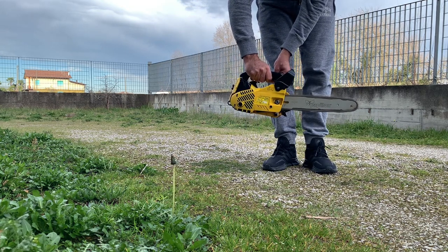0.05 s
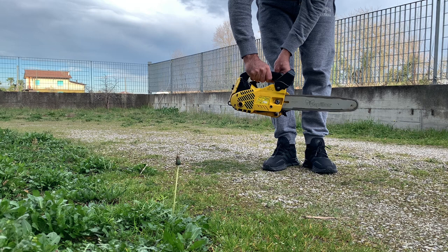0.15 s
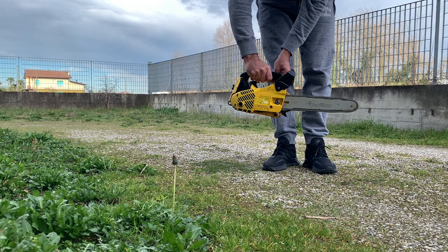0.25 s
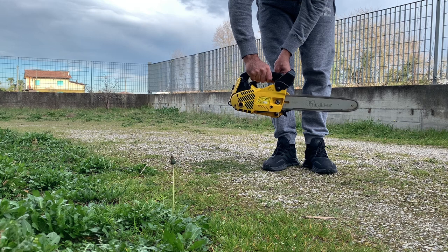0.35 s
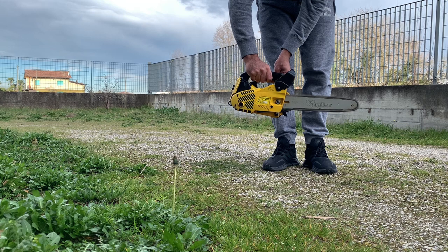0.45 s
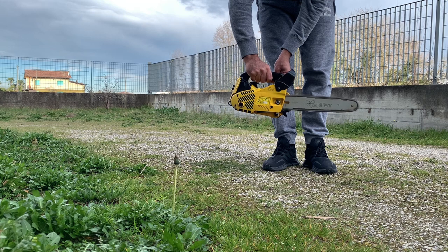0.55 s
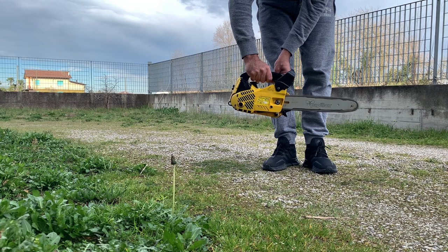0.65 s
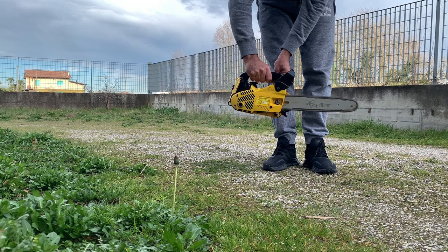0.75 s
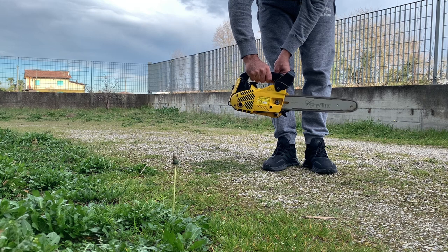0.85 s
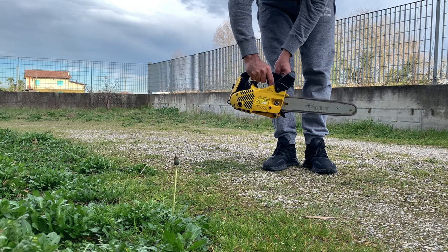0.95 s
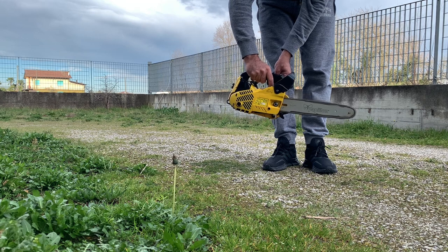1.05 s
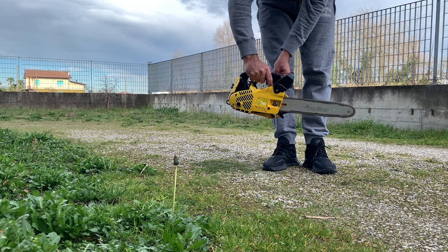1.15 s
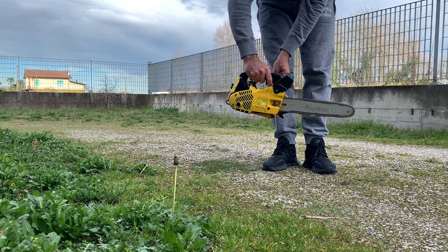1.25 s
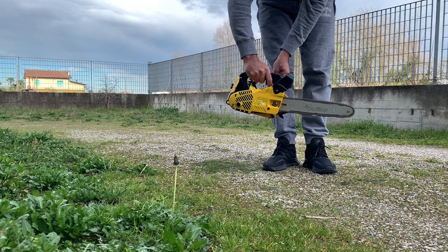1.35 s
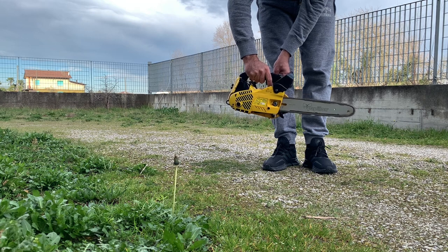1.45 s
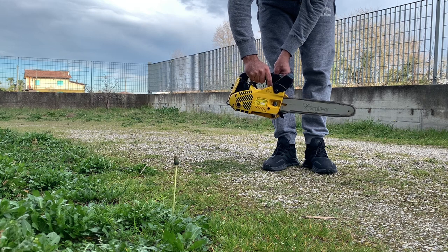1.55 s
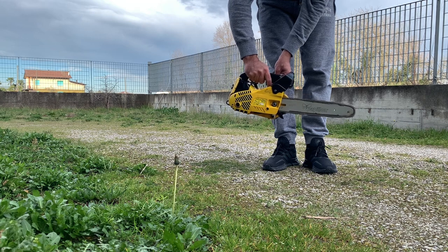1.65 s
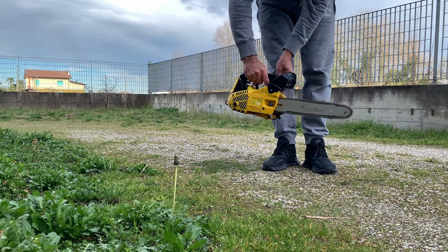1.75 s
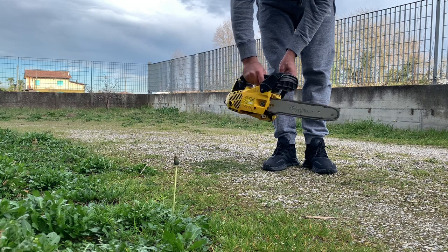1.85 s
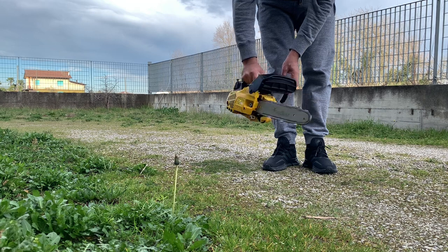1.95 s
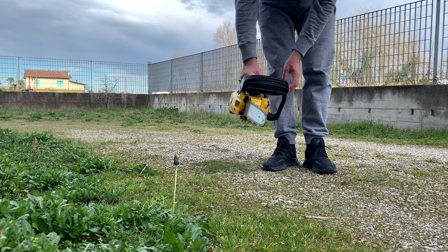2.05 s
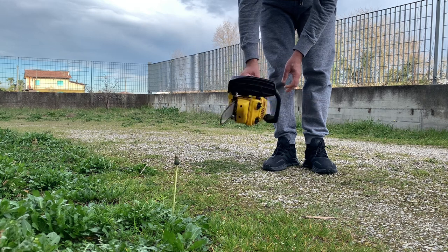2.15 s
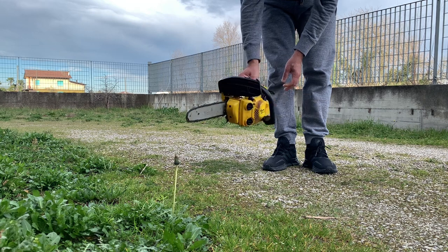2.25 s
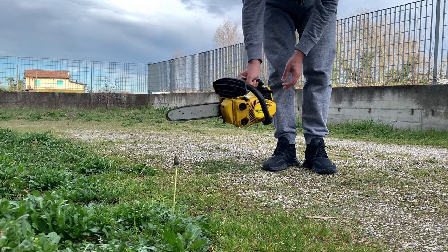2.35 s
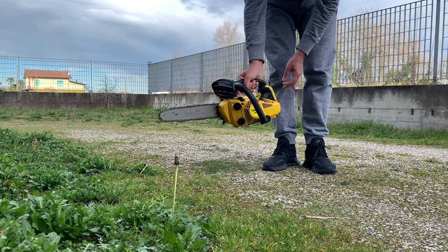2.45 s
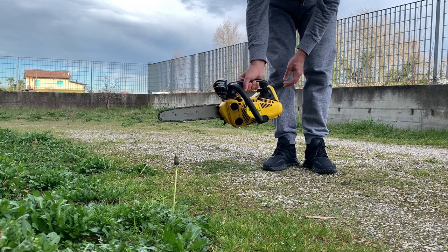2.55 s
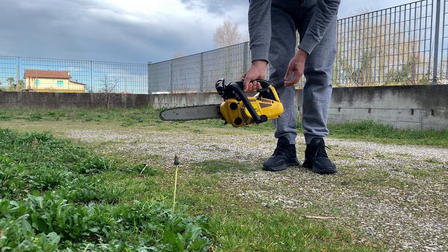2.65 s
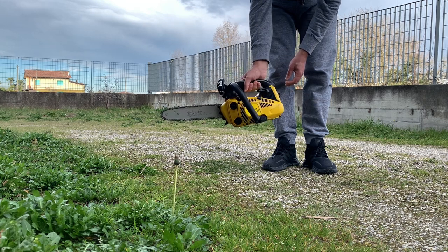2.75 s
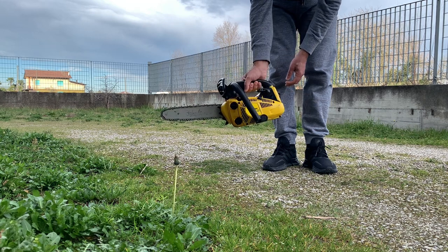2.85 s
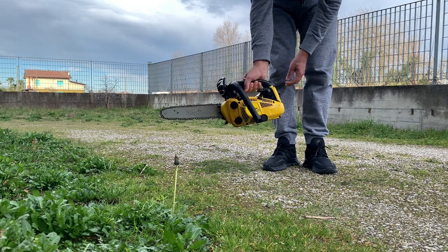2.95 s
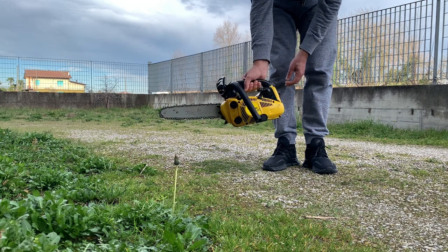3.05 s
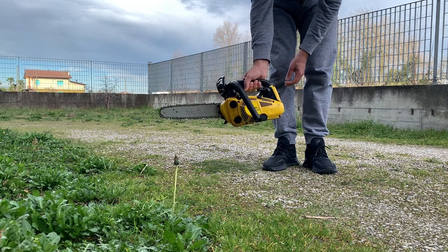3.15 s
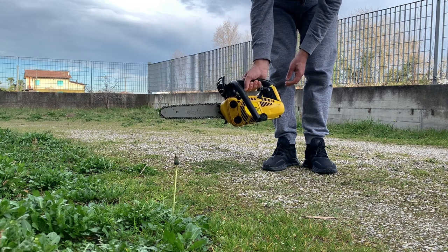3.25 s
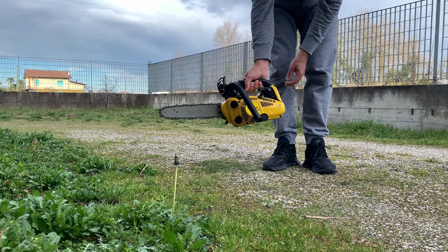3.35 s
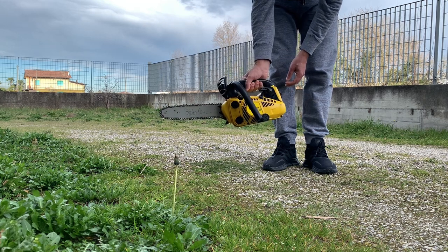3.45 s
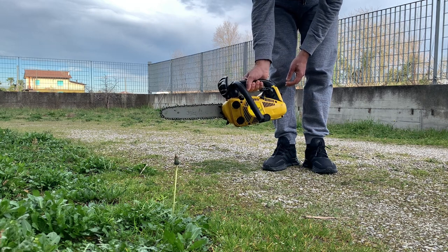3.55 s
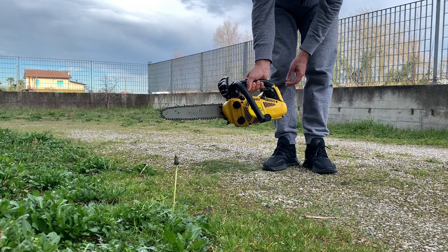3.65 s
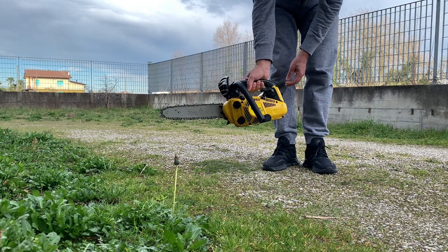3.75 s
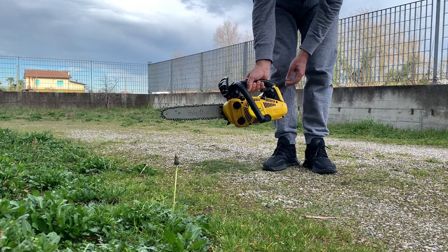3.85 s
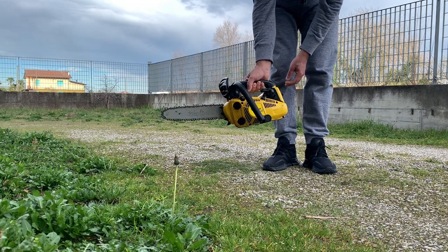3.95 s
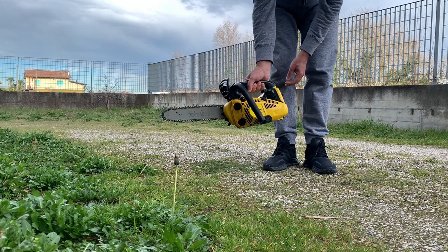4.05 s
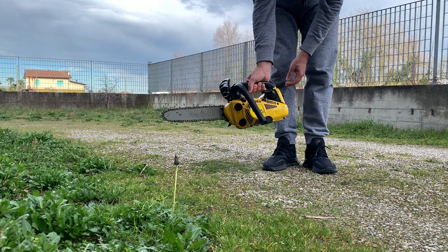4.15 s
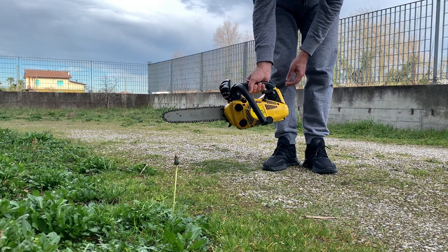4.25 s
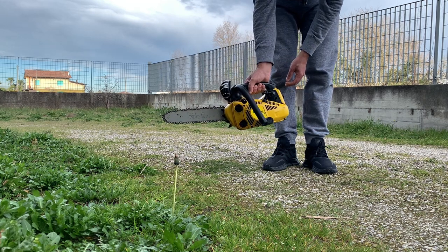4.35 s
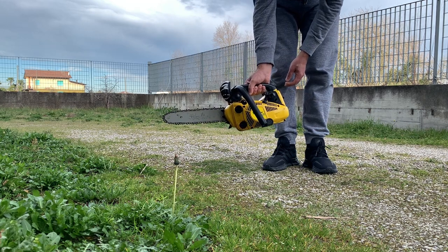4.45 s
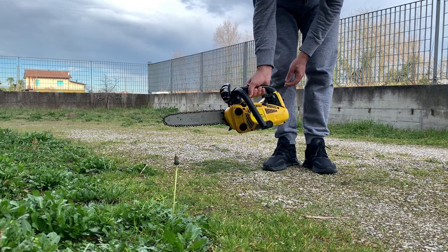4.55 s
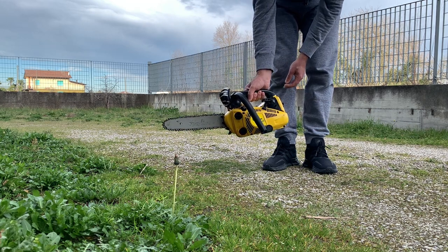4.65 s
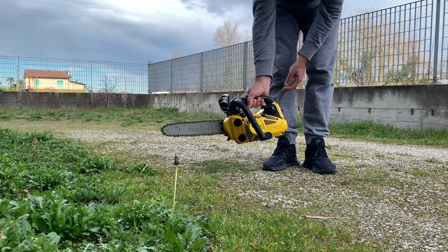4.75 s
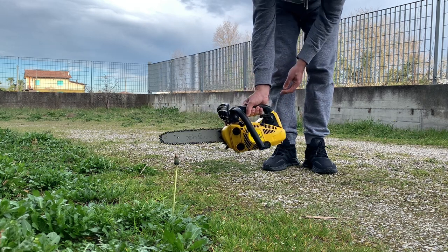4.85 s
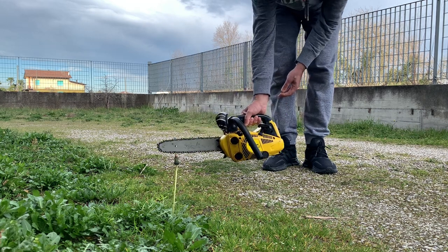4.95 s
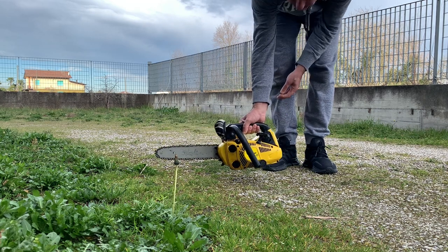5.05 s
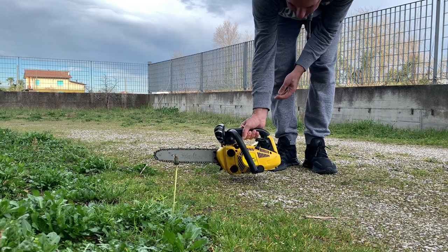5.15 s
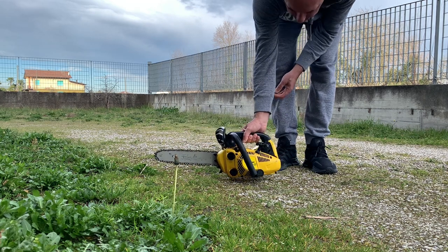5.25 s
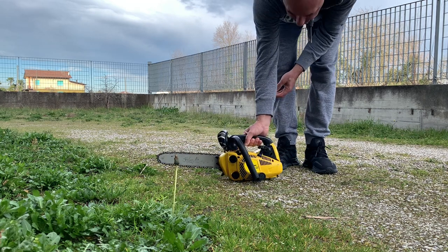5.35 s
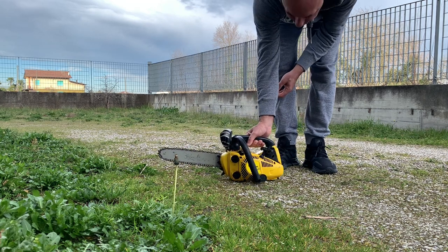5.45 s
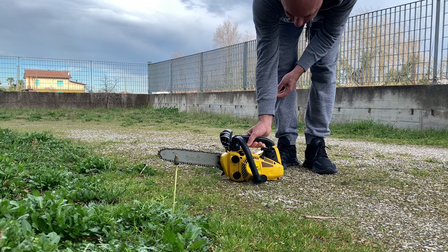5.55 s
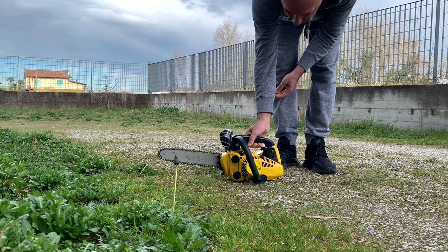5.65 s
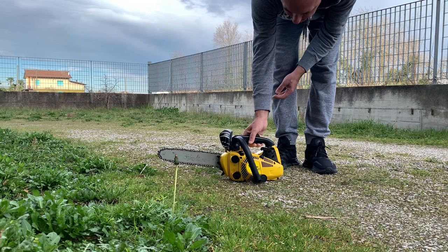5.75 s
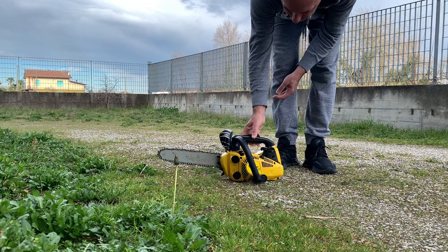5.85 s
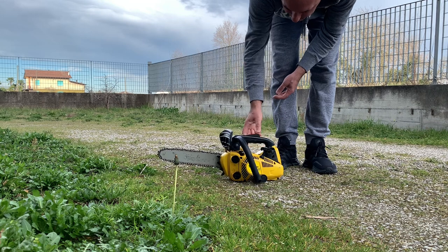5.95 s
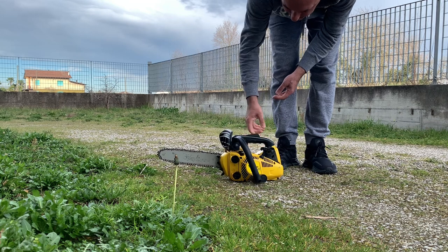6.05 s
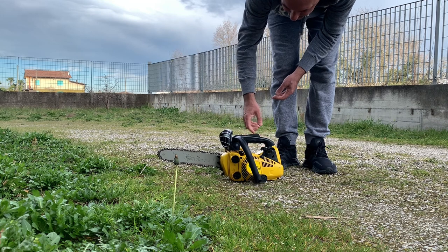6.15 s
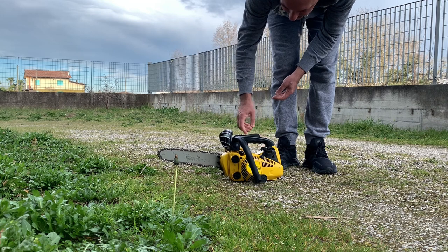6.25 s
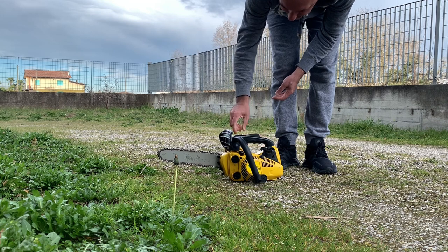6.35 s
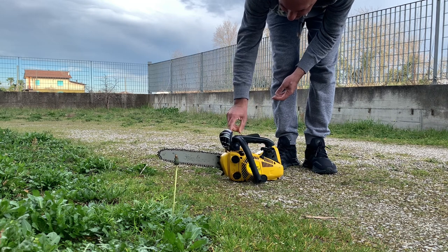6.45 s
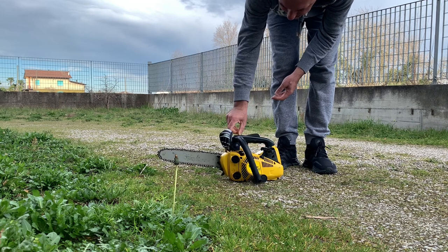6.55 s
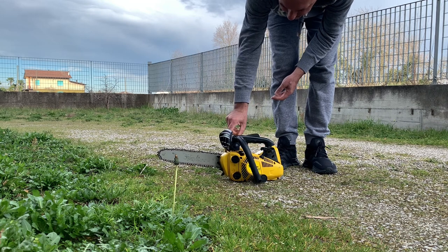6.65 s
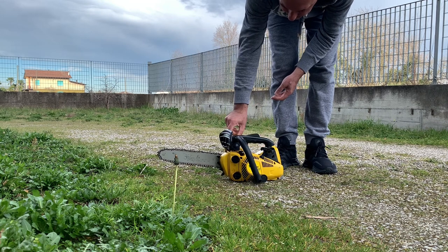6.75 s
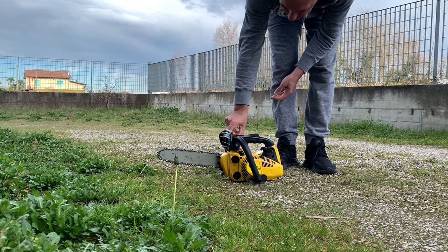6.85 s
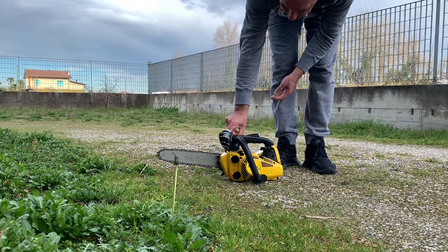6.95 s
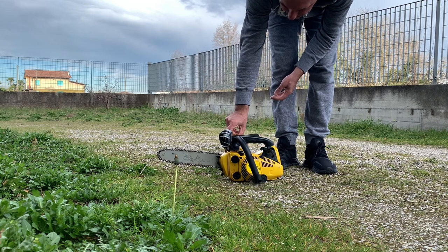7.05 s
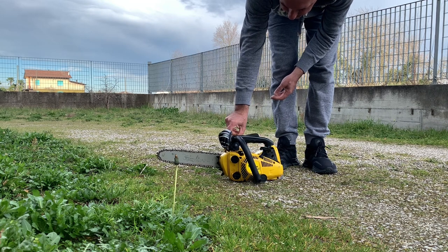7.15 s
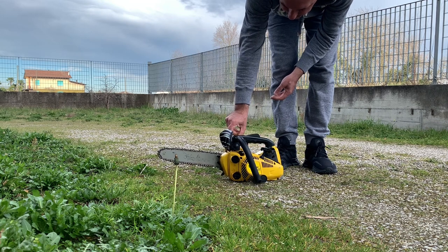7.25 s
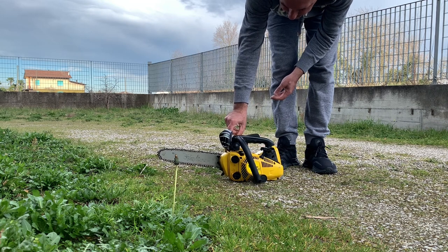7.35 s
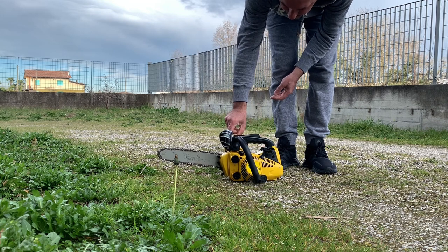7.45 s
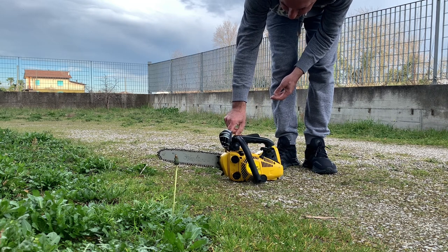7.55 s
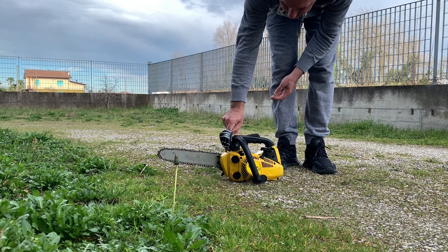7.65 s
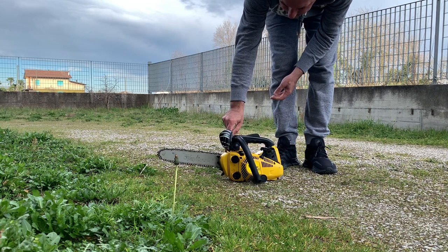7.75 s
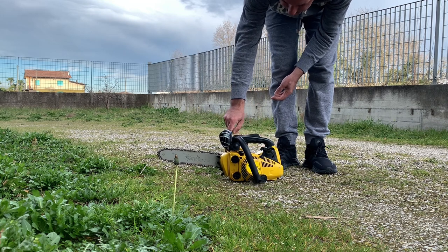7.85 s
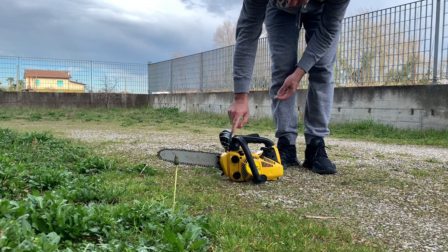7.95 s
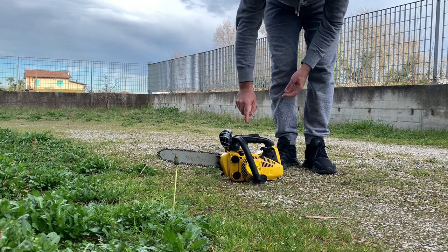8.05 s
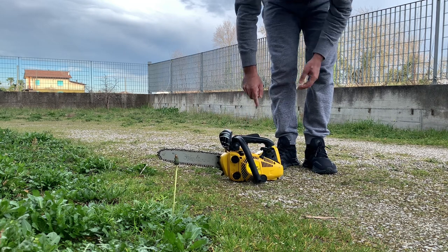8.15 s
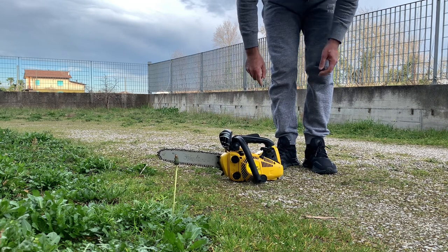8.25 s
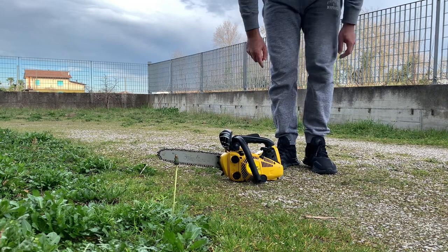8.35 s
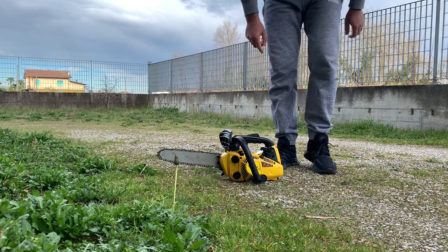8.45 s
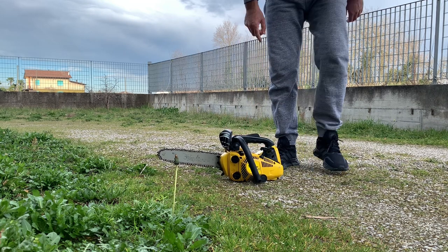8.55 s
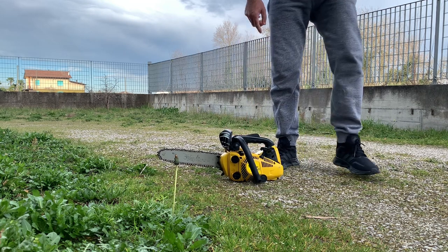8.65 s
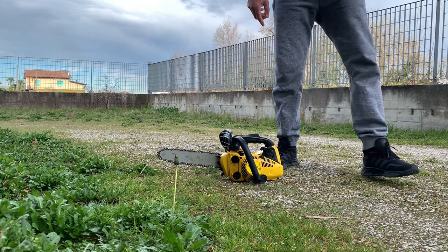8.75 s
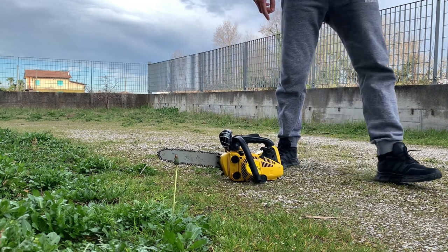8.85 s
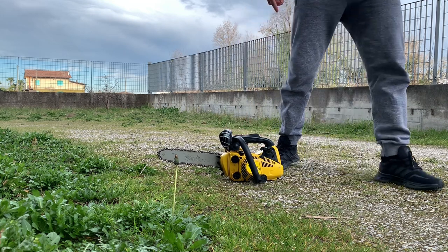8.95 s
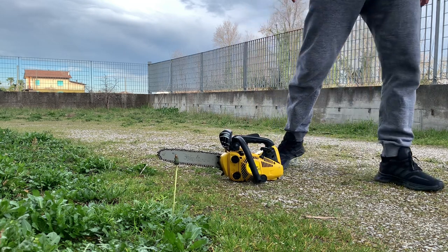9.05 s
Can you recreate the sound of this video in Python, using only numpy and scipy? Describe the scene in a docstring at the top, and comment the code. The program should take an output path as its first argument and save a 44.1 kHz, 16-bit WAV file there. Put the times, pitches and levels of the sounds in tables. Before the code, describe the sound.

A small two-stroke chainsaw a few metres away starts mid-roar at full throttle for about a second, then its pitch slides down into an uneven, popping idle with metallic clutch rattle. It is lowered to the ground, idles on slightly duller, is switched off and stops with a clunk. A few ticks, soft wind gusts and a faint shoe crunch on gravel follow. Outdoor phone microphone, fairly dry.

```python
"""Gravel outdoors: a small two-stroke chainsaw a few metres from a phone. Full throttle, a long coast down to a
lumpy idle, lowered to the ground and switched off; then ticks, wind gusts and a shoe on gravel.
Impulses timed by the crank ring muffler, outlet and casing modes; thump, bark and whine are crank harmonics.
Filtered noise makes gas, casing, chain and fan hiss; listed firings and clutch rattles add bursts.
The ground echo carves a notch that climbs as the saw is lowered."""
import sys
import numpy as np
from scipy import signal
from scipy.fft import rfft, irfft, next_fast_len
from scipy.io import wavfile
from scipy.ndimage import uniform_filter1d

SR = 44100
rng = np.random.default_rng(int(sys.argv[2]) if len(sys.argv) > 2 else 0)


def digitize_waveform(pressure):
    """Quantize a signal to 16-bit integers and store it at the path in sys.argv[1].

    Rows of a 2-D input are taken as channels; values are limited to [-1, 1].
    """
    field = np.atleast_2d(pressure).T
    bounded = np.clip(field, -1, 1)
    quanta = np.round(bounded * 32767).astype(np.int16)
    wavfile.write(sys.argv[1], SR, quanta)


N = 400859
T = np.arange(N) / SR
THROTTLE_SHUT_S, SWITCH_OFF_S, STOP_S = 0.96, 6.84, 7.15
LOWERING_S = 0.22

# strongest firings off throttle, then the last compression strokes: [start_s, relative_db]
FIRINGS = [(1.36, -18), (1.425, -16.5), (1.515, -21.5), (1.634, -20), (1.658, -29), (1.685, -17),
           (1.768, -20.5), (1.798, -19.5), (1.839, -17.5), (1.88, -20.5), (1.91, -19.5), (1.974, -21.5),
           (2.053, -24), (2.134, -22), (2.298, -19.5), (2.346, -19), (2.532, -41), (2.648, -25),
           (2.769, -24), (3.134, -26.5), (3.354, -25), (3.529, -25), (3.597, -24), (3.623, -24),
           (3.844, -26.5), (4.131, -27), (4.274, -24), (4.346, -21.5), (4.651, -22), (5.317, -26),
           (5.459, -29), (5.888, -18), (5.9188, -22), (6.045, -22.5), (6.06, -23.5), (6.08, -42),
           (6.122, -20.5), (6.137, -18), (6.218, -25), (6.277, -24.5), (6.659, -21.5), (6.721, -20),
           (6.766, -31), (6.783, -19.5), (6.917, -31), (6.937, -31), (6.958, -47), (6.982, -49),
           (7.006, -48), (7.034, -50.5), (7.068, -49), (7.11, -41), (7.178, -31)]
# casing resonances: [pitch_hz, width_hz, relative_db]
CASING = [(1260, 1620, 2), (2120, 1990, 7.5), (2470, 4780, 1), (4410, 1720, 5), (4954, 1100, -1),
          (5960, 2100, -6)]
# chain and fan resonances: [pitch_hz, width_hz, relative_db]
CHAIN = [(6510, 2000, -6.5), (8885, 1940, 0.5), (10170, 1700, -5), (13500, 2300, -5), (15000, 1500, -7)]


def undb(db):
    """Decibels to amplitude ratio."""
    return 10 ** (np.asarray(db) / 20)


def level(x, db):
    """Scale to an RMS level in dB."""
    return x * undb(db) / np.sqrt(np.mean(x ** 2))


def noise():
    """White noise over the whole scene."""
    return rng.standard_normal(N)


def ring(x, hz, width_hz):
    """Band-pass, gain 1 at the centre."""
    return signal.lfilter(*signal.iirpeak(hz, hz / width_hz, fs=SR), x)


def body(x, modes):
    """Parallel resonances of alternating sign, each applied twice: dark valleys, swelling attack."""
    out = 0
    for k, (hz, width_hz, db) in enumerate(modes):
        out = out + (-1) ** k * undb(db) * ring(ring(x, hz, width_hz), hz, width_hz)
    return out


def struck(x, modes):
    """Resonances scaled so that a unit impulse peaks at 1."""
    return body(x, modes) / np.abs(body(np.eye(1, 2000)[0], modes)).max()


def clicks(times_s, sizes):
    """Impulses, each shared between two samples."""
    place = np.asarray(times_s) * SR
    k = place.astype(int)
    out = np.zeros(N + 2)
    np.add.at(out, k, sizes * (1 - place + k))
    np.add.at(out, k + 1, sizes * (place - k))
    return out[:N]


def fade(x, tau_s):
    """Each impulse becomes an exponential decay."""
    return signal.lfilter([1], [1, -np.exp(-1 / (tau_s * SR))], x)


def burst(x, rise_s, fall_s):
    """Each impulse becomes a quick swell and a decay, peak 1."""
    def shape(v):
        return fade(fade(v, rise_s), fall_s)
    return shape(x) / shape(np.eye(1, 2000)[0]).max()


def even(x):
    """Divide out the slow level."""
    return x / np.sqrt(uniform_filter1d(x ** 2, SR // 8) + 1e-12)


def on_log(points, hz):
    """Interpolate [hz, db] points over log frequency."""
    points = np.array(points)
    return np.interp(np.log(hz + 1), np.log(points[:, 0]), points[:, 1])


def walk(rate_hz):
    """Random levels slewed from one to the next at rate_hz; spread near 0.4."""
    k = int(SR / rate_hz)
    steps = np.repeat(rng.standard_normal(N // k + 1), k)
    return 0.47 * uniform_filter1d(steps, k)[:N]


def grit_noise():
    """Noise with a fast random level."""
    return noise() * undb(7 * walk(900))


def engine():
    """Derive crank motion and levels from the speed, then sum exhaust, firings and metal."""
    # mean crank speed: [start_s, crank_hz]
    speed = [(0.0, 230.02), (0.03, 226.4), (0.18, 228.31), (0.25, 225.2), (0.33, 225.29), (0.44, 230.0),
             (0.65, 230.71), (0.8, 231.19), (0.93, 232.12), (0.99, 214.94), (1.07, 195.27), (1.15, 180.31),
             (1.25, 159.61), (1.37, 143.38), (1.49, 130.66), (1.61, 116.33), (1.73, 108.24), (1.85, 97.3),
             (1.97, 92.02), (2.09, 86.66), (2.25, 84.66), (2.39, 80.52), (2.53, 79.71), (2.67, 75.1),
             (2.81, 72.52), (2.95, 74.19), (3.09, 74.38), (3.23, 73.69), (3.37, 73.54), (3.51, 75.12),
             (3.65, 72.98), (3.79, 71.33), (3.93, 70.11), (4.07, 69.08), (4.21, 70.34), (4.35, 68.15),
             (4.49, 66.25), (4.63, 63.1), (4.77, 62.87), (4.91, 60.84), (5.05, 64.4), (5.19, 63.57),
             (5.33, 64.39), (5.47, 63.09), (5.61, 63.26), (5.75, 61.5), (5.89, 64.61), (6.03, 64.43),
             (6.17, 63.1), (6.31, 64.1), (6.45, 61.87), (6.59, 63.47), (6.73, 65.13), (6.84, 62.62),
             (6.91, 54.4), (6.99, 41.15), (7.05, 31.7), (7.13, 23)]
    # relative level of each part: [crank_hz, muffler_db, thump_db, overtones_db, casing_db, chain_db]
    by_speed = [(23.06, -41, -90.5, -59, -71, -79), (31, -36, -61, -46.5, -61, -70),
                (42, -33, -51.5, -43, -61, -75), (55.4, -28.5, -48.5, -40, -52.5, -62),
                (59.6, -27.5, -42, -46.5, -49, -60.5), (73.14, -27, -37.5, -40, -50, -52),
                (90.3, -29, -34, -39.5, -38.5, -34.5), (113, -34, -36, -35, -38, -40.5),
                (156.4, -27, -43, -32.5, -35.5, -35.5), (226, -27, -40.5, -32, -30.5, -31),
                (224.3, -26.5, -34, -29, -30, -29)]
    # full-throttle runs without skipped firings: [middle_s, length_s]
    clean_runs = [(0.04, 0.017), (0.11, 0.041), (0.229, 0.02), (0.403, 0.13), (0.491, 0.024),
                  (0.637, 0.019), (0.743, 0.15), (0.86, 0.033)]
    set_down_s, ground_muffler_db, ground_thump_db = 5, 4, 2.5
    swing_s, swing_length_s, swing_peak_db = 1.21, 0.24, 1.5  # the bar sweeps past the phone
    kick_thump_db, kick_puff_db = 10, 1

    hz = np.interp(T, *np.transpose(speed))
    kick_s, kick_db = kicks(hz)
    turn, swell = crank(hz, kick_s)
    rate, *columns = np.transpose(by_speed)
    muffler_db, thump_db, over_db, casing_db, chain_db = (np.interp(hz, rate, c) for c in columns)
    down = np.clip((T - set_down_s) / LOWERING_S + .5, 0, 1)
    muffler_db = muffler_db + ground_muffler_db * down + kick_puff_db * swell
    thump_db = thump_db + ground_thump_db * down + kick_thump_db * swell
    swing_db = swing_peak_db * np.exp(-((T - swing_s) / swing_length_s) ** 2)
    casing_db, chain_db = casing_db + swing_db / 2, chain_db + swing_db

    run = np.clip((STOP_S - T) / 0.016, 0, 1)
    opened = np.clip((THROTTLE_SHUT_S - T) / .045, 0, 1)
    clean = sum(np.exp(-(2 * (T - s) / length) ** 2) for s, length in clean_runs)
    coast = (1 - opened) * np.clip(hz / 60 - 1.5, 0, 1)
    turn_s = np.interp(np.arange(1, int(turn[-1])), turn, T)
    lumpy = np.clip(1.5 - np.interp(turn_s, T, hz) / 110, .1, 1)  # coasting fast it runs evenly
    puff_s = turn_s + .0002 * lumpy ** 2 * rng.standard_normal(len(turn_s))

    idle = muffler_puffs(hz, turn_s, puff_s, lumpy, muffler_db) * undb(1.3 * walk(28))
    idle = idle + outlet_overtones(puff_s, lumpy, over_db) * undb(2.5 * walk(24))
    idle = idle + exhaust_gas(turn, muffler_db) + intake_thump(turn, thump_db)
    exhaust = idle * (1 - opened) * run + opened * throttle_bark(turn, turn_s, clean)
    pops = firing_pops(hz, turn_s, opened, clean)

    dying = np.exp(-np.clip(T - STOP_S + 0.022, 0, 9) / 0.023)
    metal = piston_raps(hz, puff_s, lumpy, casing_db, coast)
    metal = metal + casing_and_chain_hiss(turn, casing_db, chain_db, coast)
    metal = (metal + singing_part(turn, kick_s, opened, down)) * dying
    metal = metal + clutch_rattle(hz, kick_s, kick_db) + idle_clatter(puff_s, lumpy) * run
    metal = metal + coast_whine(turn, casing_db, coast)
    return exhaust + pops + dull_on_ground(metal)


def kicks(hz):
    """Times and levels of clutch rattles: soft ones fill the gaps between strong ones at idle."""
    # strongest clutch drum rattles: [start_s, relative_db]
    strong_rattles = [(1.3601, -26), (1.422, -25), (1.5403, -28), (1.6316, -25), (1.6831, -22.5),
                      (1.769, -24), (1.8378, -25), (1.8818, -33), (1.9215, -30), (1.9741, -19),
                      (2.0655, -30), (2.226, -29.5), (2.2738, -30), (2.5451, -30), (2.673, -30.5),
                      (2.8359, -28), (7.0987, -39.5), (7.1264, -45), (7.162, -45), (7.1788, -28.5),
                      (2.3941, -27.5), (2.5977, -29.5), (2.8925, -28), (2.9474, -30), (2.9997, -28),
                      (3.0945, -31), (3.1494, -32), (3.1893, -26.5), (3.2447, -28.5), (3.2981, -29.5),
                      (3.3544, -31), (3.4223, -29.5), (3.4747, -26), (3.5275, -29), (3.6368, -35.5),
                      (3.6772, -41), (3.7341, -28.5), (3.8014, -32), (3.8598, -30), (3.9167, -27.5),
                      (3.985, -35.5), (4.0294, -40), (4.0718, -29), (4.1436, -28.5), (4.217, -27.5),
                      (4.2893, -32), (4.3776, -33), (4.437, -28.5), (4.4953, -34), (4.5876, -29.5),
                      (4.6809, -30.5), (4.7627, -30), (4.8421, -33), (4.8919, -35), (4.9378, -33.5),
                      (4.9872, -31), (5.0501, -30), (5.1139, -30), (5.1783, -31), (5.2406, -29.5),
                      (5.3005, -38.5), (5.3494, -31), (5.4108, -33.5), (5.4751, -31), (5.5385, -29.5),
                      (5.6023, -30.5), (5.6612, -36.5), (5.7126, -33), (5.7784, -31), (5.8413, -33.5),
                      (5.9346, -33.5), (5.9964, -29), (6.0733, -32.5), (6.1346, -37), (6.1845, -35),
                      (6.2319, -29.5), (6.2938, -36), (6.3416, -37), (6.3895, -29), (6.4519, -32.5),
                      (6.5008, -31.5), (6.5487, -33), (6.5981, -29), (6.6734, -31.5), (6.7353, -33),
                      (6.7986, -27)]
    idle_hz, spacing_turns = 88, 3.9
    soft_level_db, soft_spread_db = -35, 5

    turn = np.cumsum(hz) / SR
    s, db = np.transpose(sorted(strong_rattles))
    at = np.interp(s, T, turn)
    soft_turns = []
    for a, b in zip(at[:-1], at[1:]):
        count = max(int(round((b - a) / spacing_turns)), 1)
        soft_turns.append(np.linspace(a, b, count + 1)[1:-1])
    soft_s = np.interp(np.concatenate(soft_turns), turn, T)
    soft_s = soft_s[(np.interp(soft_s, T, hz) < idle_hz) & (soft_s < SWITCH_OFF_S)]
    soft_db = soft_level_db + soft_spread_db * rng.standard_normal(len(soft_s))
    all_s = np.append(s, soft_s)
    order = np.argsort(all_s)
    return all_s[order], np.append(db, soft_db)[order]


def crank(hz, kick_s):
    """Turns made and swell between kicks: each kick lifts the speed, which sags until the next."""
    start_turn = 0.1408
    droop, lag = .11, 0.11  # peak share of the mean speed; share of the gap

    turn = start_turn + np.cumsum(hz) / SR
    # each last compression stroke starts a whole turn
    strokes_s = np.array(FIRINGS)[:, 0]
    strokes_s = strokes_s[strokes_s > SWITCH_OFF_S]
    at = np.interp(strokes_s, T, turn)
    steps = np.maximum(np.round(np.diff(at)), 1)
    whole = np.round(at[0]) + np.append(0, np.cumsum(steps))
    turn = turn + np.interp(T, np.append(SWITCH_OFF_S, strokes_s), np.append(0, whole - at))

    kick_s = kick_s[kick_s < SWITCH_OFF_S]
    part = np.interp(T, kick_s, np.arange(len(kick_s)))
    gap_s = np.diff(kick_s, append=kick_s[-1])[part.astype(int)]
    slow = np.clip(1.6 - hz / 70, 0, 1)  # the light flywheel shows it only at low speed
    swell = slow * (gap_s < .09) * np.cos(2 * np.pi * (part - lag))
    sag = (part % 1) * (1 - part % 1) - 1 / 6
    ripple = uniform_filter1d(np.minimum(gap_s, .09) * sag, size=200)
    return turn + droop * slow * hz * ripple, uniform_filter1d(swell, size=200)


def muffler_puffs(hz, turn_s, puff_s, lumpy, muffler_db):
    """Each closed-throttle turn pumps an uneven puff into the muffler; transfer ports add two more."""
    # muffler resonances: [pitch_hz, width_hz, relative_db]
    muffler = [(306.6, 187, -0.5), (170, 92, 1.5), (393, 144, -7)]
    transfer_turns, transfer_db = 0.2188, 4.5  # spacing in turns above 55 Hz
    shell_hz, shell_width_hz, shell_db = 180, 20, -13

    puffs = 0
    for k, mode in enumerate(muffler):
        sizes = undb((.8 + .8 * lumpy) * rng.standard_normal(len(puff_s)))
        puffs = puffs + (-1) ** k * body(clicks(puff_s, sizes), [mode])
    delay_s = transfer_turns / np.maximum(hz, 55)
    second = np.interp(T - delay_s, T, puffs)
    third = np.interp(T - 2 * delay_s, T, puffs)
    transfer = undb(transfer_db) * np.interp(T, turn_s, lumpy) * np.clip(hz / 12 - 4, .15, 1)
    puffs = 0.82 * puffs + transfer * (second + 0.98 * third)
    puffs = ring(puffs, 330, 330)  # the port opens gradually
    shell = level(ring(clicks(puff_s, lumpy), shell_hz, shell_width_hz), 0)
    puffs = puffs + undb(shell_db) * shell * puffs.std()
    return even(puffs) * undb(muffler_db - 8.0)


def outlet_overtones(puff_s, lumpy, over_db):
    """Puffs ring outlet overtones, with extra modes while the outlet points at the phone."""
    # outlet overtones: [pitch_hz, width_hz, relative_db]
    overtones = [(614.3, 128, 7.5), (860, 108, -1.5), (985, 510, -8.5), (1893, 640, -9.5)]
    # overtones heard head on: [pitch_hz, width_hz, relative_db]
    facing = [(685, 82, 2), (926, 100, -4)]
    facing_s, facing_length_s, facing_db = 2.133, 0.09, -36

    sizes = undb(2 * lumpy * rng.standard_normal(len(puff_s)))
    over = even(body(clicks(puff_s, sizes), overtones)) * undb(over_db - 2.0)
    head_on = body(clicks(puff_s, undb(2.5 * rng.standard_normal(len(puff_s)))), facing)
    window = np.exp(-((T - facing_s) / facing_length_s) ** 2)
    return over + level(head_on, facing_db) * window


def exhaust_gas(turn, muffler_db):
    """Turbulent gas: band noise that decays through each turn."""
    # gas bands: [pitch_hz, width_hz, relative_db]
    gas_bands = [(300, 260, 0), (620, 250, -10)]
    gas = level(body(noise(), gas_bands), -22)
    return gas * undb(muffler_db + 1.57 * walk(45)) * (1.14 + np.exp(-(turn % 1) / 0.68))


def intake_thump(turn, thump_db):
    """Intake pressure wave: crank harmonics 1 to 3."""
    lead_turns = 0.4  # of the fundamental
    wave = np.sin(2 * np.pi * (turn + lead_turns))
    wave = wave + 0.13 * np.sin(4 * np.pi * turn) + 0.52 * np.sin(6 * np.pi * turn)
    return wave * undb(thump_db - 7.0 + 1.1 * walk(26))


def throttle_bark(turn, turn_s, clean):
    """Full throttle: steady crank harmonics, plus uneven outlet pulses that fall in clean runs."""
    # bark lines: [crank_multiple, relative_db]
    bark_lines = [(1, 2), (2, -12), (3, -5.5), (4, -6), (5, -33), (6, -11), (7, -1.45), (8, -20.5),
                  (9, -19.5), (10, -28.5), (11, -26.5), (12, -18.5), (13, -28.5), (15, -18.5), (19, -19.5),
                  (20, -17), (25, -22.5)]
    # exhaust outlet resonances: [pitch_hz, width_hz, relative_db]
    outlet = [(87.4, 110, 4), (310, 220, 14), (584, 200, 11.5), (880, 240, 6.5), (1810, 540, -32),
              (3316, 760, -24)]
    bark_db, clean_gain_db = -25, 2
    skip_db, clean_drop_db = -36.5, -9

    bark = 0
    for k, db in bark_lines:
        bark = bark + undb(db + 0.27 * np.sqrt(k) * walk(17)) * np.cos(2 * np.pi * k * turn)
    # sign alternates from turn to turn, at times holding
    swap = np.cumprod(np.where(rng.standard_normal(len(turn_s)) > .9, 1., -1.))
    sizes = swap * undb(3.2 * rng.standard_normal(len(turn_s)))
    skips = level(body(clicks(turn_s, sizes), outlet), 0.86)
    return bark * undb(bark_db + clean_gain_db * clean) + skips * undb(skip_db + clean_drop_db * clean)


def firing_pops(hz, turn_s, opened, clean):
    """Firings ring the outlet; hard ones after skipped turns at full throttle also crack."""
    # outlet pop: [pitch_hz, width_hz, relative_db]
    pop_modes = [(303.7, 190, 4), (650, 260, -2.5), (903, 230, -3.5), (1820, 420, -23)]
    # outlet crack: [pitch_hz, width_hz, relative_db]
    crack_modes = [(1900, 820, -9.5), (2940, 1200, -8), (5780, 1100, 2.5)]
    # hard firings: [start_s, crack_db]
    hard_firings = [(0.0218, -19.5), (0.0483, -21.5), (0.0747, -20.5), (0.18, -21), (0.1931, -16.5),
                    (0.2404, -19), (0.2818, -17.5), (0.2952, -19), (0.3435, -23.5), (0.379, -19.5),
                    (0.41, -23.5), (0.4707, -20.5), (0.51, -17.5), (0.5444, -21.5), (0.5574, -19.5),
                    (0.5884, -17), (0.6693, -20.5), (0.6952, -22.5)]
    sputter_hz, weak_share = 112, .13
    weak_db, weak_spread_db = -33, 2
    hard_pop_db = 1.5  # against the crack

    spread = rng.standard_normal(len(turn_s))
    slow = np.interp(turn_s, T, hz) < sputter_hz
    weak = (rng.random(len(turn_s)) < weak_share) & slow & (turn_s < SWITCH_OFF_S)
    s, db = np.transpose(FIRINGS)
    blast = clicks(s, undb(db)) + clicks(turn_s, weak * undb(weak_db + weak_spread_db * spread))

    s, db = np.transpose(hard_firings)
    hard = clicks(s, undb(db))
    unclean = np.interp(turn_s, T, opened * np.exp(-3 * clean))
    small = clicks(turn_s, unclean * undb(-28 + 7.8 * spread))
    late_pop = undb(hard_pop_db) * struck(np.roll(hard, 40), pop_modes)  # lags by 40 samples
    return struck(blast, pop_modes) + struck(hard + small, crack_modes) + late_pop


def clutch_rattle(hz, kick_s, kick_db):
    """A firing jerks the crank and the loose clutch chatters: noise bursts, treble rebounding later."""
    body_db, treble_mean_db, treble_spread_db = -8, -10.5, 2.2
    rebound_db, rebound_turns = -3.5, 1.1

    grit = grit_noise()
    rattle = 0
    for k, mode in enumerate(CASING):
        colour_db = 2.5 * rng.standard_normal(len(kick_s))  # each rattle favours other casing parts
        envelope = burst(clicks(kick_s, undb(kick_db + colour_db - 3)), 0.0016, 0.0044)
        rattle = rattle + (-1) ** k * body(grit, [mode]) * envelope
    rattle = rattle * undb(body_db) / body(grit, CASING).std()

    treble_db = treble_mean_db + treble_spread_db * rng.standard_normal(len(kick_s))
    again_s = kick_s + rebound_turns / np.interp(kick_s, T, hz)
    again = (again_s < SWITCH_OFF_S) * undb(kick_db + rebound_db + treble_db[::-1])
    bright = clicks(kick_s, undb(kick_db + treble_db)) + clicks(again_s, again)
    return rattle + level(body(grit, CHAIN), 0) * burst(bright, 0.0007, 0.006)


def idle_clatter(puff_s, lumpy):
    """Each slow turn rattles the casing a little, at a random delay of up to 4.4 ms."""
    late_s = puff_s + 0.0044 * rng.random(len(puff_s))
    sizes = (lumpy > .7) * undb(-48.5 + 5 * rng.standard_normal(len(puff_s)))
    return level(body(grit_noise(), CASING), 0) * burst(clicks(late_s, sizes), .001, 0.0027)


def piston_raps(hz, puff_s, lumpy, casing_db, coast):
    """At speed the piston raps the casing on every turn."""
    raps = even(body(clicks(puff_s, 1 - lumpy + .1), CASING))
    return raps * undb(casing_db - 7.5 - 3.5 * coast) * np.clip(hz / 150 - .4, .02, 1)


def casing_and_chain_hiss(turn, casing_db, chain_db, coast):
    """Noise through casing and chain resonances, pulsing once a turn."""
    gate = 1 + 0.17 * np.cos(2 * np.pi * (turn - .1))
    casing = level(body(noise(), CASING), 0.93) * undb(casing_db - 3.5 * coast + 2 * walk(40))
    chain = level(body(noise(), CHAIN), 0.76) * undb(chain_db + 2 * walk(30))
    return (casing + chain) * gate


def singing_part(turn, kick_s, opened, down):
    """A metal part sings as the clutch side faces the phone: flickering noise bands struck by rattles."""
    # song level: [start_s, relative_db]
    song = [(0.75, -46), (1.5, -59.5), (2.25, -66.5), (2.6, -44.5), (3.4, -57.5), (4.101, -53), (4.85, -65),
            (5.87, -51), (6.75, -52), (7.1, -77)]
    low_db = 1.5

    high = sum(body(noise(), [(hz, 170, 0)]) * undb(9 * walk(25)) for hz in (3560, 3700))
    grit = grit_noise()
    low = sum(body(grit, [(hz, 200, -3)]) * undb(9 * walk(30)) for hz in (1850, 2120))
    sing = high + undb(low_db) * (1 - down) * low  # the low ring is damped on the ground
    sing = level(sing * undb(4 * walk(40)) * (1 + .5 * np.cos(2 * np.pi * turn)), -1)
    strikes = 1.1 + 1.2 * burst(clicks(kick_s, np.ones(len(kick_s))), 0.00053, 0.012)
    s, db = np.transpose(song)
    return sing * (1 - .7 * opened) * undb(np.interp(T, s, db)) * strikes


def coast_whine(turn, casing_db, coast):
    """Coasting: patchy crank harmonics, and noise through parts that sing while the chain runs."""
    # whine lines: [crank_multiple, relative_db]
    whine_lines = [(7, 2.5), (8, 2), (9, 1.5), (11, 0), (12, -5), (14, -5), (16, -4.5), (18, -5.5),
                   (21, -2.5), (26, -2)]
    # singing parts: [pitch_hz, width_hz, relative_db]
    chain_rings = [(2492, 130, 0), (5460, 140, -2.5)]
    whine_db, rings_db = -8, -11

    whine = 0
    for k, db in whine_lines:
        whine = whine + undb(db + 5 * walk(22)) * np.cos(2 * np.pi * k * turn + 1.5 * walk(30))
    whine = ring(whine * undb(whine_db), 1900, 1500)
    return (whine + level(body(noise(), chain_rings), rings_db)) * undb(casing_db) * coast


def dull_on_ground(metal):
    """Subtract a casing band as the saw tips while being lowered."""
    tilt_s = 4.56
    dull_hz, dull_width_hz, dull_share = 4460, 2750, 0.54
    tipped = np.clip((T - tilt_s) / LOWERING_S + .5, 0, 1)
    return metal - dull_share * tipped * ring(metal, dull_hz, dull_width_hz)


def ticks():
    """Switch, handle and gravel underfoot: short noise cracks ringing near their own pitch."""
    # ticks: [start_s, relative_db, pitch_hz]
    tick_list = [(7.127, -42, 1343), (7.1394, -42, 9300), (7.1606, -42, 1700), (7.167, -36, 322),
                 (7.1788, -26, 1460), (7.203, -52, 1600), (7.235, -56, 900), (7.299, -64, 1860),
                 (7.326, -53, 1950), (7.3627, -62, 1005), (7.579, -40, 3330), (7.5963, -39, 8800),
                 (7.6017, -55, 9060), (7.6266, -68, 9640), (7.636, -70, 9260), (7.6494, -70, 8620),
                 (8.464, -64, 1750), (8.465, -65, 4000), (8.8396, -68, 1792), (8.899, -62, 1800),
                 (8.959, -56.5, 2325), (8.9803, -58, 1580)]
    out = np.zeros(N)
    t = np.arange(2000) / SR
    for s, db, hz in tick_list:
        k = int(s * SR)
        snap = rng.standard_normal(len(t)) * np.exp(-t / 0.0014) * np.clip(t / 0.00095, 0, 1)
        crack = ring(snap, hz, 0.28 * hz) + undb(-26.0) * ring(snap, 2670, 5000)
        out[k:k + len(t)] += (crack / np.abs(crack).max() * undb(db))[:N - k]
    return out


def last_ring():
    """A small metal part rings out: one decaying sine."""
    start_s, start_db, hz, tau_s = 7, -70, 6250, 0.04
    decay = (T > start_s) * np.exp(-np.clip(T - start_s, 0, 9) / tau_s)
    return undb(start_db) * decay * np.sin(2 * np.pi * hz * T)


def gravel_crunch():
    """A shoe turns on the gravel: flickering noise in two bands."""
    # crunch level: [start_s, level_db]
    crunch_levels = [(8.8, -100), (8.84, -88), (8.93, -90), (8.97, -75.5), (9.03, -86), (9.09, -94)]
    s, db = np.transpose(crunch_levels)
    stones = body(noise() * undb(9 * walk(500)), [(1826, 1500, 0.5), (3600, 2500, -5.5)])
    return level(stones, 0) * undb(np.interp(T, s, db, -120))


def wind():
    """Low noise: rumble while the engine runs, then gusts on the microphone."""
    # gusts: [peak_s, peak_db, rise_s, fall_s]
    gust_list = [(7.285, -56, .04, 0.13), (7.528, -57, 0.076, .07), (7.658, -60, 0.051, 0.063),
                 (7.856, -59.5, 0.11, 0.26), (8.4, -56, 0.056, 0.19), (8.648, -61, 0.12, 0.046),
                 (8.9, -61, 0.22, 0.064), (9.022, -60, 0.054, 0.051)]
    rumble_db, calm_db = -49, -66.5

    lifts_db = [(rumble_db - calm_db) * np.clip(1 - (T - STOP_S) / 0.18, 0, 1)]
    for s, db, rise_s, fall_s in gust_list:
        lifts_db.append((db - calm_db) * np.interp(T, [s - rise_s, s, s + fall_s], [0, 1, 0]))
    rumble = level(ring(ring(ring(noise(), 71, 60), 58, 69), 86, 90), 0)
    return rumble * undb(calm_db + np.max(lifts_db, axis=0))


def far_whistle():
    """A thin faint tone far off: narrow noise."""
    return level(ring(ring(noise(), 2670, 14), 2670, 14), -105)


def field_hush():
    """Faint hush of the field: shaped noise, mid and side drawn apart."""
    # hush spectrum: [pitch_hz, relative_db]
    spectrum = [(59, -26), (100, -10.5), (182, -20.5), (368, -20.5), (432, -28.5), (468, -29.5),
                (727, -37.5), (943, -39), (1300, -45), (1800, -52), (4000, -56.5), (12000, -58.5),
                (15600, -99.5), (22000, -120)]
    hush_db = -72
    size = next_fast_len(N)
    hz = np.arange(size // 2 + 1) * SR / size
    gain = undb(on_log(spectrum, hz))

    def hush():
        return irfft(rfft(noise() * undb(3 * walk(5.2)), size) * gain, size)[:N]
    return level(hush(), hush_db) + level(hush(), hush_db - 5.0) * np.array([[1], [-1]])


def ground_echo(direct):
    """Delayed copy off rough gravel, which mirrors the lows and scatters the treble."""
    # ground path: [start_s, extra_delay_ms, strength_db]
    ground_path = [(0, .34, -1), (2, .33, -1), (3, .3, -1), (4.6, .29, -1), (4.9, .21, -3), (5.2, .13, -7),
                   (9.1, .13, -7)]
    s, ms, db = np.transpose(ground_path)
    late = np.interp(T - np.interp(T, s, ms) / 1000, T, direct)
    lows = signal.butter(1, 2500, fs=SR, output="sos")
    return undb(np.interp(T, s, db)) * signal.sosfilt(lows, late)


def two_ports(saw):
    """Ports lie apart: the side signal runs a quarter cycle from the mid, with a left-right tilt."""
    # left minus right: [pitch_hz, difference_db]
    port_tilt = [(60, 1), (110, 0.5), (200, 3.5), (380, -2.5), (700, -0.5), (1290, -1), (2380, -1),
                 (4400, -7), (8120, 1), (15000, -0.5)]
    # side minus mid, before a 5.5 dB cut: [pitch_hz, difference_db]
    port_side = [(60, -26.5), (110, -7), (200, -20), (380, -8.5), (700, 0), (1290, -1), (2380, -28.5),
                 (4400, 1), (8120, 5.5), (15000, 3)]
    size = next_fast_len(N)
    hz = np.arange(size // 2 + 1) * SR / size
    side = 1j * undb(on_log(port_side, hz) - 5.5)
    tilt = undb(on_log(port_tilt, hz) / 2)
    spectrum = rfft(saw, size)
    return np.array([irfft(spectrum * g, size)[:N] for g in ((1 + side) * tilt, (1 - side) / tilt)])


def scattered_tail(saw):
    """Wall and fence scatter a short bright tail: decaying noise, unlike in the two ports."""
    tails = []
    for _ in range(2):
        grain = rng.standard_normal(6000) * np.exp(-np.arange(6000) / SR / 0.024)
        tail = ring(grain, 2400, 3700) + undb(-1.5) * ring(ring(grain, 3900, 4500), 2100, 9200)
        tails.append(tail + undb(-11.5) * ring(grain, 19000, 4000) + ring(grain, 8800, 3000))
    return undb(-36) * signal.fftconvolve(saw[None], np.array(tails), axes=1)[:, :N]


def scene():
    """Saw and ticks with ground echo, spread over two ports, then the outdoors."""
    direct = engine() + ticks() + last_ring()
    saw = direct + ground_echo(direct)
    saw = signal.sosfilt(signal.butter(2, 45, "high", fs=SR, output="sos"), saw) * undb(-0.5)
    outdoors = gravel_crunch() + wind() + far_whistle() + field_hush()
    return two_ports(saw) + scattered_tail(saw) + outdoors


def record(dry):
    """The phone cuts the top above 15.7 kHz."""
    return signal.sosfilt(signal.ellip(10, .2, 70, 15700, fs=SR, output="sos"), dry)


dry = scene()
out = record(dry)
digitize_waveform(out)
```